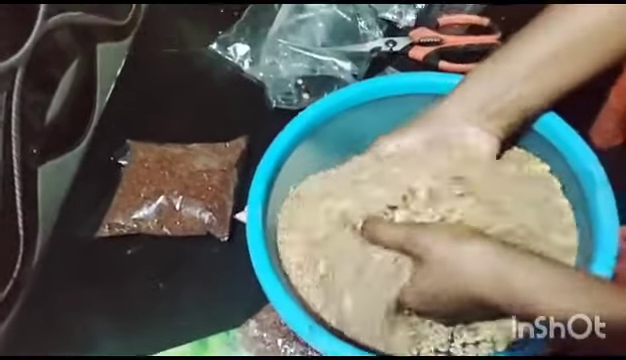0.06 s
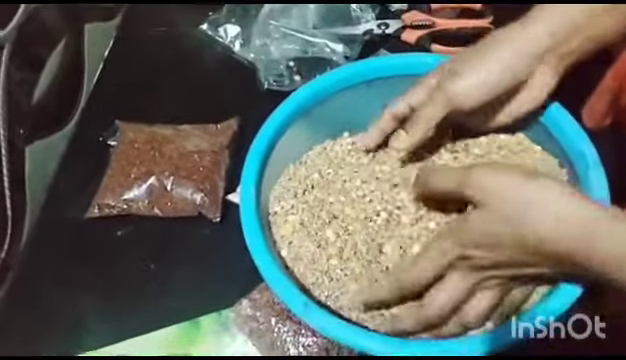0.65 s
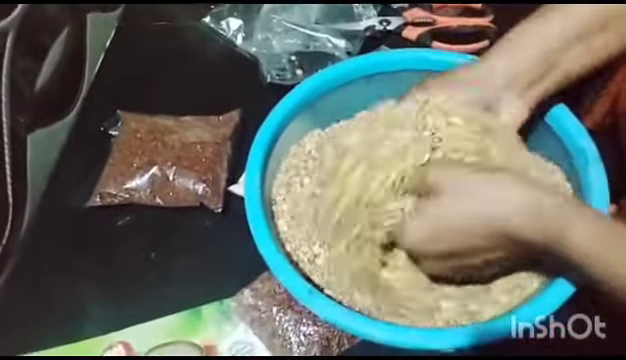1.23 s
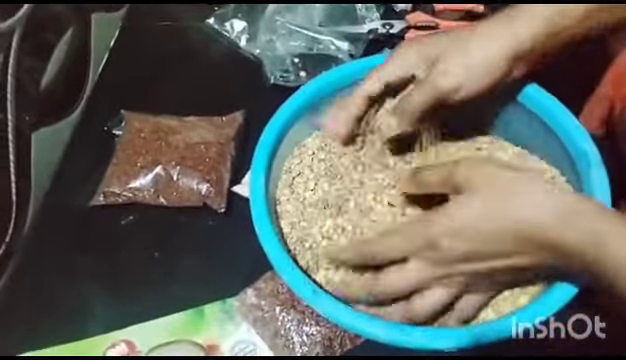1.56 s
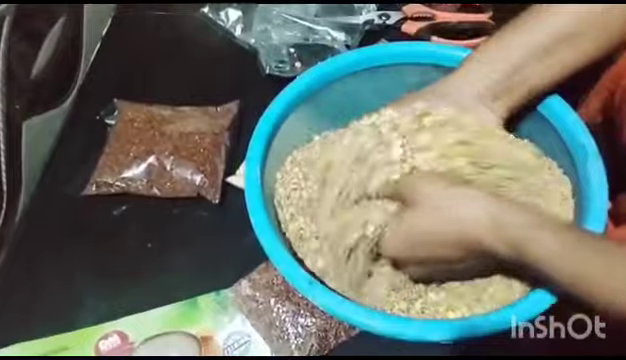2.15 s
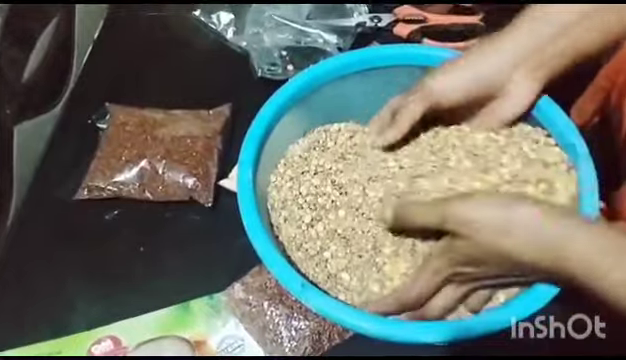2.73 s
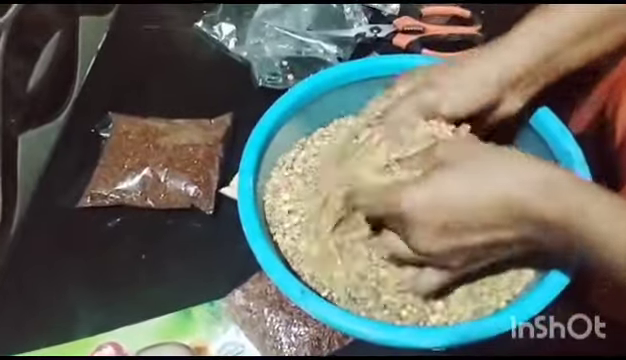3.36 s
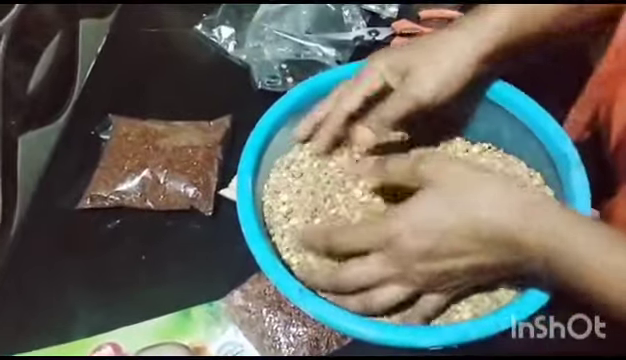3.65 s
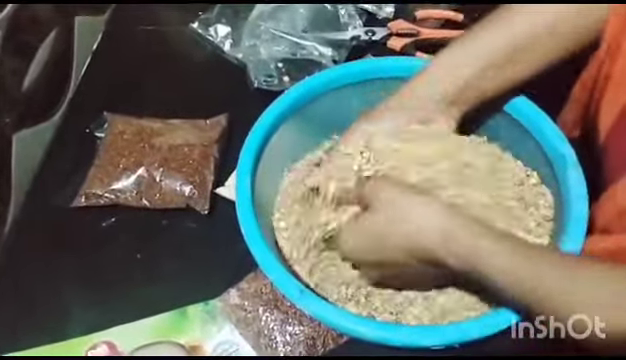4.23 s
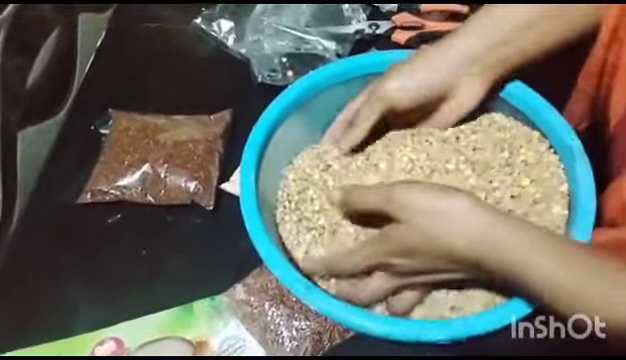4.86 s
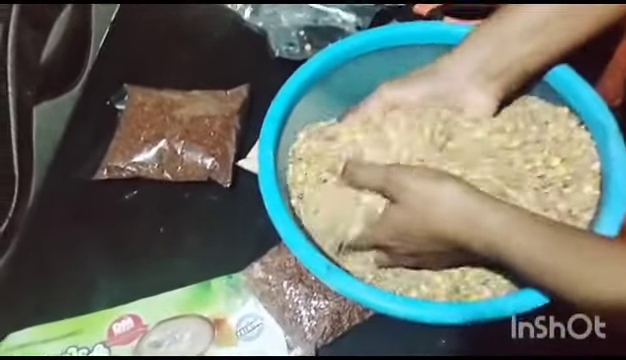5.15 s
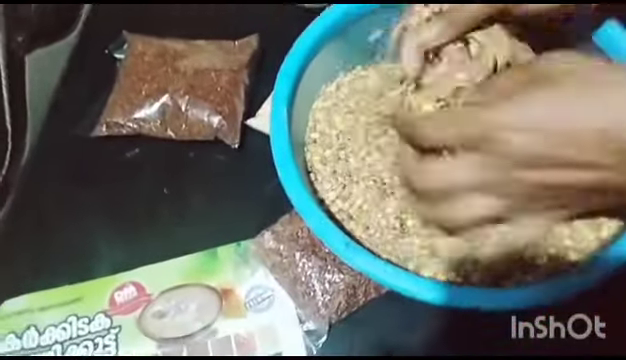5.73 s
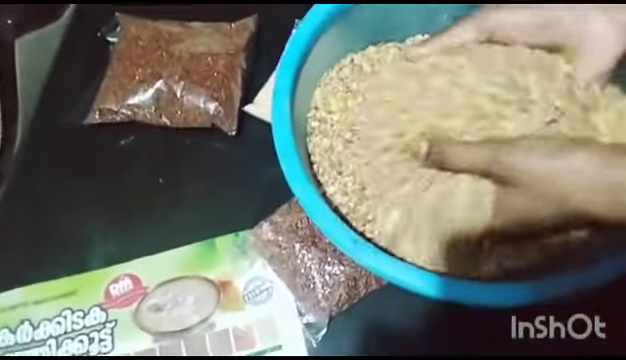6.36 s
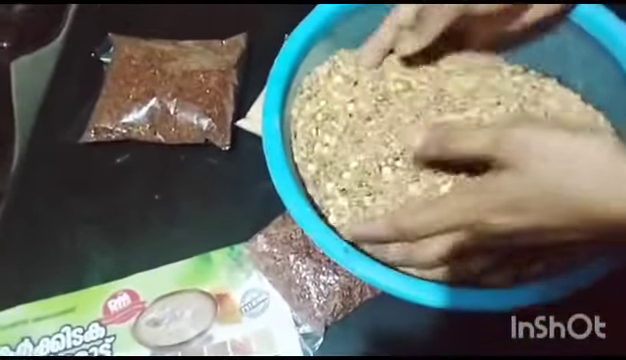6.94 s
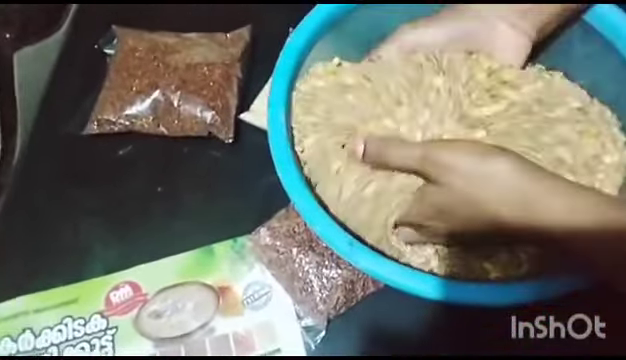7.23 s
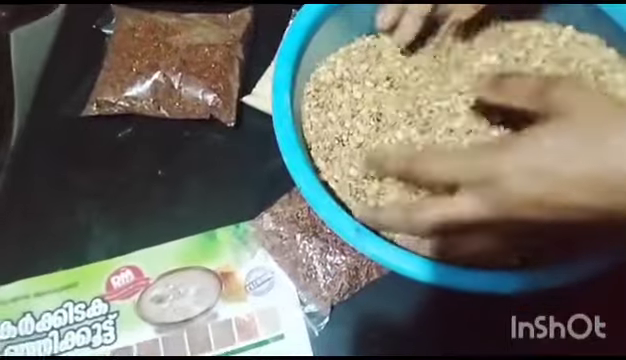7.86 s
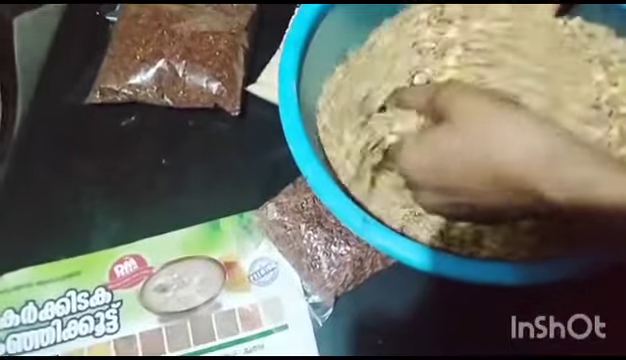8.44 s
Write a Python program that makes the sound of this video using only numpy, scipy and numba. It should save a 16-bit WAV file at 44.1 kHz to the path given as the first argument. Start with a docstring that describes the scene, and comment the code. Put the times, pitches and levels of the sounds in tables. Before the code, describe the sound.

Hands scoop and turn dry grains in a plastic basin, with rustling, crunching and handfuls pattering back about once a second.

```python
"""Dry grains and pulses in a plastic basin, scooped, lifted and turned by two hands about once a second.
Digging in makes them rub and crunch, jammed grains let go in short slips, and fingers tap and knock the
wall. Each handful pours back onto the heap and drums on the basin, and the table booms under it.
Small room with a faint room tone; two-port microphone, close to the basin."""
import sys
import numpy as np
from scipy import signal
from scipy.fft import rfft, irfft, next_fast_len
from scipy.io import wavfile
from numba import njit

SR = 44100
rng = np.random.default_rng(int(sys.argv[2]) if len(sys.argv) > 2 else 0)


def waveform_to_disk(signal):
    """Save audio, clipped to [-1, 1], as 16-bit WAV at the path in sys.argv[1]."""
    frames = np.transpose(np.atleast_2d(signal))
    scaled = np.clip(frames, -1, 1) * 32767
    samples = np.round(scaled).astype(np.int16)
    wavfile.write(sys.argv[1], SR, samples)


N = 378730
TIME = np.arange(N) / SR
FFT_SIZE = next_fast_len(N + SR // 2, real=True)
BIN_HZ = np.maximum(np.arange(FFT_SIZE // 2 + 1) * SR / FFT_SIZE, 1)

# Levels in all tables are relative: each layer adds its own gain.
# fingers push through the heap: t/s, length/s, rub level/dB, crunch level/dB, air gap f/Hz
PUSHES = [(0.0, .02, -33.5, -39.5, 2800), (0.092, 0.12, -36, -54.5, 2970),
          (0.243, 0.073, -35.5, -50.5, 2920), (0.345, .27, -30, -40.5, 2750), (0.7, 0.098, -47, -40, 2300),
          (0.923, 0.17, -36.5, -40.5, 2640), (1.158, 0.082, -30, -42, 2430),
          (1.309, 0.036, -30.5, -42, 2800), (1.41, 0.28, -32.5, -39, 2840), (1.734, .21, -35.5, -36, 2160),
          (1.988, .11, -30, -38.5, 2590), (2.15, 0.21, -33.5, -47, 2630), (2.327, .05, -32.5, -39, 2700),
          (2.48, .05, -27.5, -35.5, 2740), (2.587, 0.15, -37.5, -40, 2360), (2.833, .13, -36, -39, 2130),
          (3.027, .04, -36, -37.5, 2280), (3.137, 0.12, -35, -48, 2710), (3.29, 0.017, -27.5, -39, 2150),
          (3.57, 0.27, -36, -39, 2700), (3.866, .06, -34.5, -33.5, 1910), (3.954, .17, -31.5, -36.5, 2120),
          (4.188, .07, -32, -38.5, 2830), (4.347, 0.019, -31, -37, 2740), (4.455, 0.089, -36.5, -43, 2620),
          (4.638, 0.048, -32.5, -41.5, 1920), (4.77, .16, -40.5, -41, 2000),
          (4.973, 0.04, -32.5, -36, 1900), (5.048, 0.09, -46.5, -41.5, 1820), (5.306, .1, -35, -40, 2770),
          (5.479, 0.03, -33.5, -43.5, 2740), (5.61, 0.013, -30, -42.5, 2490),
          (5.687, 0.03, -28.5, -35, 2220), (5.772, 0.11, -32, -36, 2270), (5.97, .13, -45, -38, 2300),
          (6.169, .045, -32, -32.5, 2440), (6.314, 0.071, -31.5, -32.5, 1980),
          (6.464, 0.15, -34, -40.5, 2400), (6.678, .21, -34.5, -38.5, 2480), (6.934, .09, -39.5, -33, 2430),
          (7.041, 0.15, -34.5, -37, 2340), (7.291, 0.11, -32, -37.5, 2580),
          (7.53, 0.039, -29.5, -36.5, 2440), (7.717, 0.3, -35, -40.5, 2470), (8.127, .13, -31, -33.5, 2080),
          (8.3, .08, -33.5, -36.5, 1970), (8.439, 0.19, -30, -36.5, 2410)]
# handfuls fall: spill t/s, landing t/s, landing length/s, patter/dB, drumming/dB, boom/dB, hollow f/Hz
HANDFULS = [(0.582, 0.708, .1, -32.5, -35, -58.5, 1080), (1.572, 1.695, 0.027, -30, -33, -58.5, 1060),
            (2.507, 2.642, 0.057, -33, -34, -58, 1040), (3.597, 3.765, .08, -33, -38.5, -65.5, 1080),
            (4.691, 4.837, .05, -32.5, -33.5, -58.5, 1020), (5.818, 5.966, .14, -33, -36, -55, 950),
            (6.805, 6.968, 0.035, -31.5, -30.5, -57, 840), (7.86, 7.962, 0.062, -31.5, -36, -59, 990)]
# spectra of husks rubbing, pulses crunching and falling grains pattering: f/Hz, level/dB
RUB_SPECTRUM = [(1500, -19.5), (4000, -8.5), (6500, -3), (8500, 0.5), (11500, 3), (15800, 2.5)]
CRUNCH_SPECTRUM = [(450, -28), (1150, -14), (1600, -1.5), (2700, -6), (4200, -7), (7000, -15), (15000, -23)]
PATTER_SPECTRUM = [(600, -28), (2000, -6), (4300, 0), (7000, -2), (9000, -2.5), (12000, -7.5),
                   (15800, -18.5)]


def from_db(db):
    return 10 ** (np.asarray(db) / 20)


def unit_rms(x):
    """Scale so that the mean of the channels has an RMS of 1."""
    return x / np.sqrt(np.mean(x.mean(axis=0) ** 2) + 1e-20)


def curve_db(points):
    """A spectrum in dB, joined on a log-frequency axis."""
    hz, db = np.transpose(points)
    return np.interp(np.log(BIN_HZ), np.log(hz), db)


def coloured(x, response_db):
    """Minimum-phase filter: nothing sounds before its cause."""
    cepstrum = irfft(np.log(from_db(response_db)), FFT_SIZE)
    cepstrum[1:FFT_SIZE // 2] *= 2
    cepstrum[FFT_SIZE // 2 + 1:] = 0
    return irfft(rfft(x, FFT_SIZE) * np.exp(rfft(cepstrum)), FFT_SIZE)[..., :N]


@njit
def resonance(x, hz, q):
    """A band-pass of gain 1 whose centre moves."""
    out = np.zeros_like(x)
    for c in range(len(x)):
        low = band = 0.
        for i in range(x.shape[1]):
            step = 2 * np.sin(np.pi * hz[i] / SR)
            low += step * band
            band += step * (x[c, i] - low - band / q)
            out[c, i] = band / q
    return out


def swells(starts, ends, levels_db, rise_db_per_s, fall_db_per_s, rest_db):
    """Level in dB of movements that build up, hold from start to end and ebb; the heap never quite rests."""
    t = TIME[::64, None]
    db = levels_db - rise_db_per_s * np.maximum(starts - t, 0) - fall_db_per_s * np.maximum(t - ends, 0)
    power = np.sum(from_db(db) ** 2, axis=1) + from_db(rest_db) ** 2
    return np.interp(TIME, t[:, 0], 10 * np.log10(power))


def bursts(starts, levels_db, t60s, rise_s):
    """Envelope of sudden releases that die away."""
    out, t = np.zeros(N), np.arange(SR // 4) / SR
    for start, db, t60 in zip(starts, levels_db, t60s):
        i = round(start * SR)
        shape = (1 - np.exp(-t / rise_s)) * from_db(db - 60 * t / t60)
        out[i:i + len(t)] += shape[:N - i]
    return out


def avalanches(per_s):
    """Activity, in standard deviations, that jumps at random moments and ebbs."""
    starts = rng.random(N) < per_s / SR
    activity = signal.lfilter([1], [1, -np.exp(-per_s / SR)], starts + 1e-18)
    return np.minimum((activity - activity.mean()) / activity.std(), 3)


def contacts(per_s, spread_db, clump_db, clumps_per_s, pan_db, lag_s):
    """Random clicks in small avalanches; each reaches the two ports with its own lag and strength."""
    at = np.flatnonzero(rng.random(N) < per_s / SR)
    size = from_db(spread_db * np.minimum(rng.exponential(1, N), 4)) * rng.choice([-1, 1], N)
    size = (size * from_db(clump_db * avalanches(clumps_per_s)))[at]
    lag = np.round(rng.standard_normal(N)[at] * lag_s * SR).astype(int)
    pan = pan_db * rng.uniform(-0.98, 1, N)[at]
    left = np.bincount(np.clip(at + lag, 0, N - 1), size * from_db(pan), N)
    right = np.bincount(at, size * from_db(-pan), N)
    return np.array([left, right])


def grains(level_db, spectrum, per_s, **texture):
    """A stream of contacts: the harder the grains move, the more of them touch."""
    flow = from_db(level_db - np.mean(level_db))
    rate = np.clip(per_s * flow, 30, SR / 2)
    clicks = contacts(rate, **texture) / np.sqrt(rate)
    return from_db(level_db) * unit_rms(coloured(clicks, curve_db(spectrum)))


def push_levels():
    """Rubbing and crunch both rise and ebb with each push of the fingers."""
    start, length, rub_db, crunch_db, _ = np.transpose(PUSHES)
    slopes = dict(rise_db_per_s=285.5, fall_db_per_s=195)
    return (swells(start, start + length, rub_db, rest_db=-38, **slopes),
            swells(start, start + length, crunch_db, rest_db=-53.5, **slopes))


def digging(rub_db, crunch_db):
    """Husks rub finely past the fingers; larger pulses crunch, and the air gap at the fingers rings."""
    rub = grains(rub_db + 2, RUB_SPECTRUM, per_s=14000,
                 spread_db=4, clump_db=0.7, clumps_per_s=140, pan_db=1.5, lag_s=.0003)
    crunch = grains(crunch_db - 5.5, CRUNCH_SPECTRUM, per_s=5500,
                    spread_db=3, clump_db=2.35, clumps_per_s=110, pan_db=6.5, lag_s=.00013)
    start, length, _, _, gap_hz = np.transpose(PUSHES)
    gliding_hz = np.interp(TIME, start + length / 2, gap_hz)
    return rub + crunch + from_db(1.5) * resonance(crunch, gliding_hz, q=2.2)


def taps():
    """Fingertips and hard pulses hit the wall: a dull click and a short ring, damped by the grains."""
    # hard hits on the wall: t/s, level/dB, f/Hz, t60/s
    hits = [(0.334, -17.5, 1910, 0.021), (1.416, -18, 1020, 0.018), (1.43, -21, 1860, 0.018),
            (2.31, -25, 1560, 0.032), (4.5, -33, 2250, 0.018), (5.642, -18.5, 1800, 0.027),
            (6.286, -26, 2080, 0.018), (6.352, -20, 1810, 0.024), (6.939, -19, 960, 0.02),
            (7.645, -26, 2390, 0.026), (8.099, -19, 970, 0.026), (8.364, -17, 1650, 0.037)]
    # spectrum of the click: f/Hz, level/dB
    click_spectrum = [(200, -44), (700, -6), (1300, 9), (2200, 8), (4500, 0), (9000, -31)]
    clicks, rings, t = np.zeros(N), np.zeros(N), np.arange(SR // 10) / SR
    for start, db, hz, t60 in hits:
        i = round(start * SR)
        clicks[i] = from_db(db)
        ring = from_db(db - 60 * t / t60) * np.sin(2 * np.pi * hz * t)
        rings[i:i + len(t)] += ring[:N - i]
    return from_db(11.5) * coloured(clicks, curve_db(click_spectrum)) + from_db(-9) * rings


def slips():
    """A jam collapses in a short, dense volley of contacts."""
    # jammed grains let go: t/s, patter and rub level/dB, crunch level/dB, t60/s
    collapses = [(0.3711, -5, -30, 0.035), (1.1334, -12, -31, 0.05), (1.1648, -10, -40, 0.034),
                 (1.3046, -5, -44, 0.053), (2.351, -5.5, -47, 0.086), (3.3675, -18, -28.5, 0.045),
                 (3.4256, -10.5, -46, 0.028), (4.1672, -18, -25.5, 0.043), (4.3415, -13, -41, 0.03),
                 (4.3514, -8, -40, 0.03), (5.2825, -8.5, -42, 0.03), (5.3137, -9, -26.5, 0.031),
                 (5.3758, -10, -27, 0.057), (5.5144, -9, -47, 0.031), (5.642, -11, -30, 0.046),
                 (6.1544, -9, -32, 0.03), (6.2854, -12, -34, 0.03), (6.3904, 2.5, -33, 0.027),
                 (6.552, -6.5, -29, 0.04), (6.6364, -8, -41, 0.025), (8.2384, -12, -32, 0.025),
                 (8.481, -17, -25, 0.019)]
    start, slip_db, crunch_db, t60 = np.transpose(collapses)
    layers = (CRUNCH_SPECTRUM, crunch_db - .5), (PATTER_SPECTRUM, slip_db - 19), (RUB_SPECTRUM, slip_db - 14)
    out = np.zeros((2, N))
    for spectrum, db in layers:
        volley = contacts(14000, spread_db=0.5, clump_db=5, clumps_per_s=458, pan_db=3.5, lag_s=.0002)
        out += bursts(start, db, t60, rise_s=.0008) * unit_rms(coloured(volley, curve_db(spectrum)))
    return out


def knocks():
    """A soft blow pushes the wall, which swings a few times at the pitch of the place it was hit."""
    # clumps and fingers strike the basin: t/s, level/dB, f/Hz, t60/s
    blows = [(0.444, -40, 549, 0.045), (1.41, -28.5, 431, 0.038), (1.43, -33, 345, 0.045),
             (2.359, -40, 258, 0.06), (3.446, -35, 380, 0.049), (4.524, -30, 362, 0.023),
             (4.605, -45, 342, 0.036), (6.042, -33, 437, 0.045), (6.694, -29, 388, 0.038),
             (6.945, -24.5, 485, 0.079), (7.669, -33, 394, 0.034), (7.693, -32, 452, 0.045),
             (7.759, -33, 262, 0.061)]
    out = np.zeros(N)
    for start, db, hz, t60 in blows:
        out += bursts([start], [db - 2], [t60], rise_s=.0022) * np.sin(2 * np.pi * hz * (TIME - start))
    return out


def shifting_weight():
    """The table booms and the plastic wall rumbles under the shifting weight of each handful."""
    # spectra of the table and of the wall: f/Hz, level/dB
    boom_spectrum = [(30, -24), (60, -12), (88, 12), (112, 8.5), (150, -8), (400, -27.5)]
    rumble_spectrum = [(60, -18.5), (130, -10), (220, -3.5), (390, -4), (650, -2.5), (2000, -35)]
    spill, land, _, _, _, weight_db, _ = np.transpose(HANDFULS)
    press = spill - 0.068  # the hands press on the wall before the spill
    boom_db = swells(spill, land, weight_db, rise_db_per_s=59, fall_db_per_s=60, rest_db=-70.5)
    rumble_db = swells(press, land, levels_db=-50, rise_db_per_s=108, fall_db_per_s=59, rest_db=-62.5)
    boom = grains(boom_db, boom_spectrum, per_s=1500,
                  spread_db=0.5, clump_db=1.5, clumps_per_s=30, pan_db=0.3, lag_s=.0001)
    rumble = grains(rumble_db, rumble_spectrum, per_s=1200,
                    spread_db=4.5, clump_db=2, clumps_per_s=36, pan_db=2.5, lag_s=.0001)
    return boom + rumble


def pattering(crunch_db):
    """Grains tick on their neighbours as they spill from the hands or are shaken loose by a push."""
    spill, land, _, patter_db, _, _, _ = np.transpose(HANDFULS)
    falling_db = swells(spill, land, patter_db, rise_db_per_s=64.5, fall_db_per_s=48, rest_db=-52.5)
    shaken_db = crunch_db - 2
    loose_db = 20 * np.log10(np.hypot(from_db(falling_db), from_db(shaken_db)))
    return grains(loose_db + 0.98, PATTER_SPECTRUM, per_s=13000,
                  spread_db=2.2, clump_db=1.2, clumps_per_s=110, pan_db=6.5, lag_s=.0003)


def drumming():
    """Heavier grains land and drum in the hollow under the hands, which is deepest at the landing."""
    # spectrum of the landing grains: f/Hz, level/dB
    drum_spectrum = [(120, -40), (330, -17), (500, 1.5), (950, -0.5), (1300, 2), (2200, 1), (6000, -41)]
    _, land, length, _, drum_db, _, hollow_hz = np.transpose(HANDFULS)
    landing_db = swells(land - length / 2, land + length / 2, drum_db,
                        rise_db_per_s=58.5, fall_db_per_s=62.5, rest_db=-54.5)
    drum = grains(landing_db - 4.5, drum_spectrum, per_s=1600,
                  spread_db=2, clump_db=-0.1, clumps_per_s=82, pan_db=4, lag_s=.00008)
    nearest = np.searchsorted((land[:-1] + land[1:]) / 2, TIME)
    octaves_up = np.minimum(1.53 * abs(TIME - land[nearest]), .5)
    return drum + from_db(1.5) * resonance(drum, hollow_hz[nearest] * 2 ** octaves_up, q=3.2)


def basin_body(x):
    """Basin and table colour every contact; a basin this small hardly radiates deep bass."""
    # resonances and dips of basin and table: f/Hz, width/Hz, level/dB
    modes = [(103, 48, 2), (253, 110, 0.5), (361, 85, 6), (487.5, 12.3, 7.5), (563, 19, -13), (638, 96, 6),
             (750, 12, 2.5), (839, 45, 4.5), (895, 32, -3.5), (1026, 220, 4.5), (2710, 240, 2)]
    body_db = sum(db / (1 + (2 * (BIN_HZ - hz) / width) ** 2) for hz, width, db in modes)
    bass_cut = signal.butter(4, 106, "high", fs=SR, output="sos")
    return signal.sosfilt(bass_cut, coloured(x, body_db - 1))


def room_reflections(x, t60_s=0.29, gap_s=.003):
    """The small room returns scattered reflections, different at each port, after a short gap."""
    t = np.arange(SR // 3) / SR
    echoes = rng.standard_normal((2, len(t))) * from_db(-60 * t / t60_s) * (t > gap_s)
    echoes /= np.sqrt(np.sum(echoes ** 2, axis=1, keepdims=True))
    reflected = signal.fftconvolve(x, echoes, axes=1)[:, :N]
    return coloured(reflected, curve_db([(100, -40), (600, 8.5), (3000, 3.5), (15000, -5)]))


def room_tone():
    """Steady low noise, the same at both ports."""
    spectrum_db = curve_db([(20, -8), (70, -2), (200, -1.5), (600, -3), (3000, -30), (15000, -34)])
    return unit_rms(coloured(rng.standard_normal((1, N)), spectrum_db))


def scene():
    """The basin close up, the room's reflections behind it and a faint room tone underneath."""
    rub_db, crunch_db = push_levels()
    heap = digging(rub_db, crunch_db) + pattering(crunch_db) + drumming() + slips()
    direct = basin_body(heap + taps() + knocks() + shifting_weight())
    return direct + from_db(-11.5) * room_reflections(direct) + from_db(-66) * room_tone()


def record(dry):
    """Close microphone: each port has its own colour, the right a treble resonance; the top is cut."""
    # response of each port: f/Hz, level/dB
    left_port = [(100, 0.1), (260, 0.6), (420, -2.3), (800, 2.3), (1050, -1.2), (1700, 1.5), (3000, 0.5),
                 (4500, -3.4), (6300, -7.2), (7400, -6.8), (8700, -6.2), (10000, -5.1), (13300, -1.1),
                 (15600, -7.8)]
    right_port = [(100, -0.1), (260, 0.2), (420, 2.7), (800, -0.2), (1050, 2.5), (1700, 2.1), (3000, 4.8),
                  (4500, 6.1), (6300, 3.2), (7400, 5.6), (8700, 11.7), (10000, 5.8), (13300, 2.7),
                  (15600, 5.2)]
    ports = np.array([coloured(x, curve_db(port)) for x, port in zip(dry, (left_port, right_port))])
    top_cut = signal.ellip(14, .2, 75, 15850, fs=SR, output="sos")
    return signal.sosfilt(top_cut, ports)


dry = scene()
out = record(dry)
waveform_to_disk(out)
```